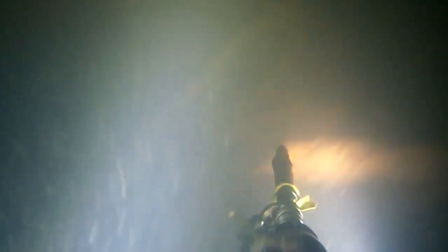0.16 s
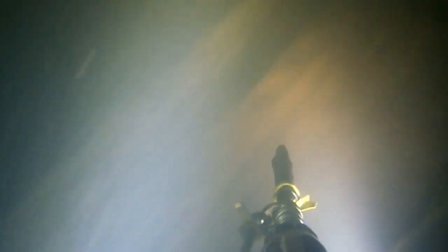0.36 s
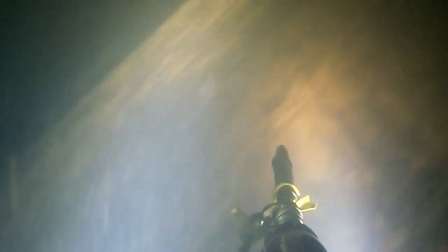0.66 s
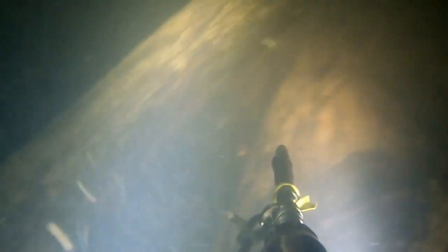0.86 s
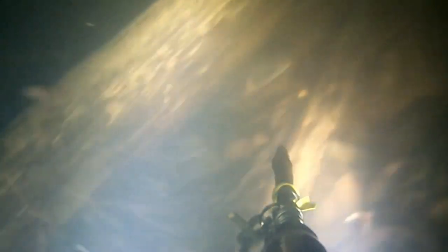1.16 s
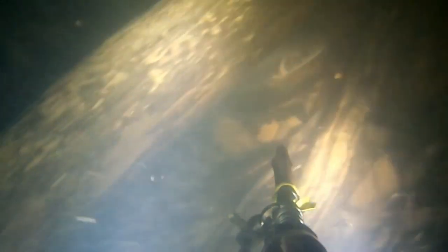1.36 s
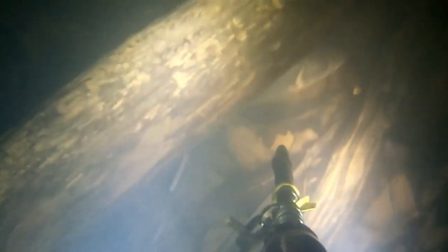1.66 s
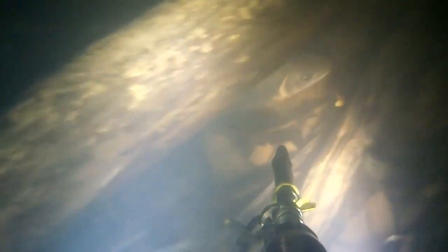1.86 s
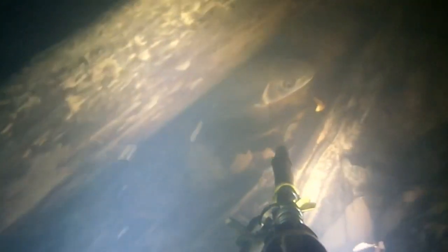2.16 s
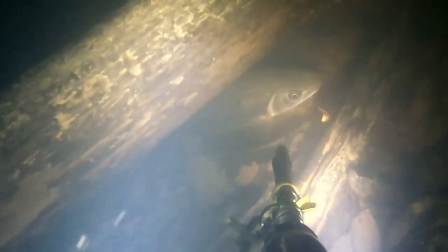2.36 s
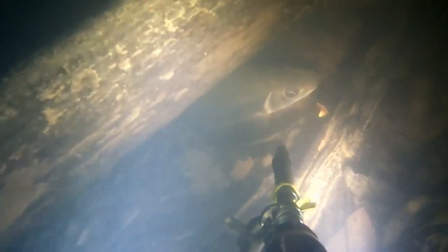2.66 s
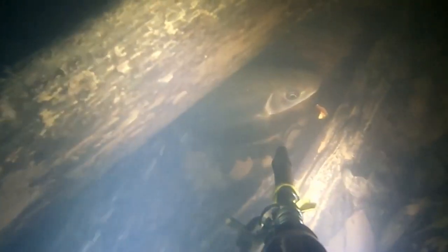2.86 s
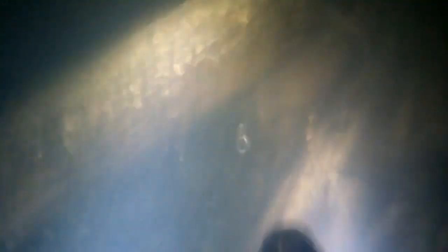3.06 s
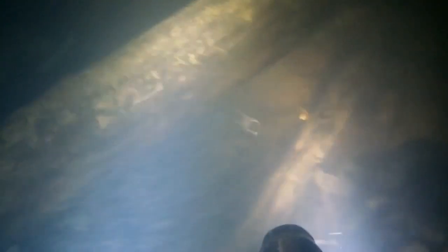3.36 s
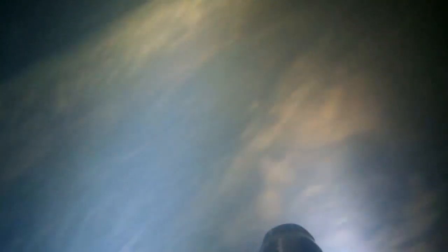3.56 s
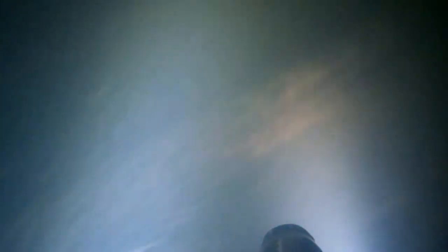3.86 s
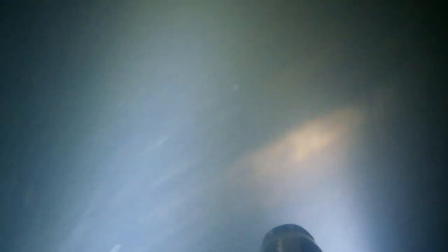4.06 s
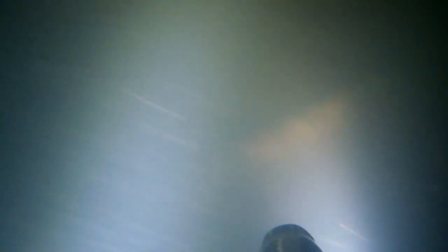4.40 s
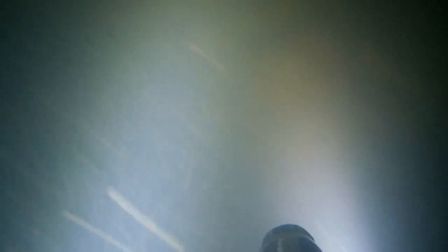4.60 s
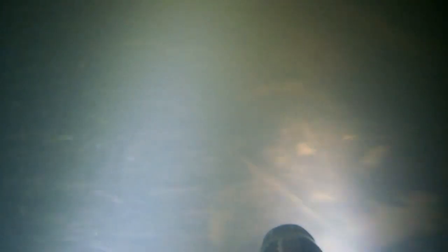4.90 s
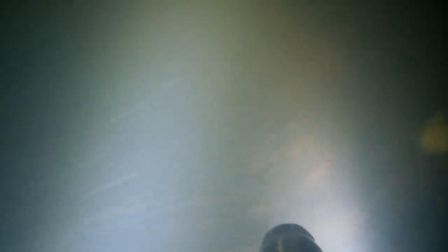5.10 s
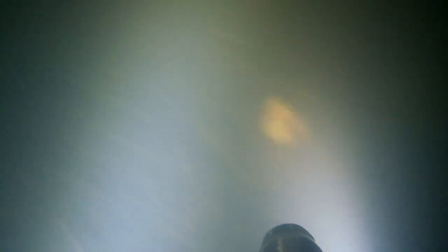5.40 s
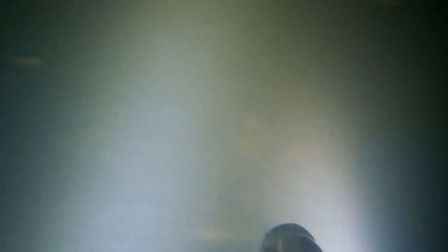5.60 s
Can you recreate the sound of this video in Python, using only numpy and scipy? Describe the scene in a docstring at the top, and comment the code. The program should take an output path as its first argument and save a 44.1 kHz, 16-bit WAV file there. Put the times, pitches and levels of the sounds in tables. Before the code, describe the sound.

Inside a sealed housing underwater, near-silence breaks with a huge distorted clanging blow, followed by hollow glugs, knocks, rasping line and scattered bubbles.

```python
"""Under a river, a sealed camera housing rides on a speargun, its microphone close to the barrel.
The gun fires: the trigger drags, the spear slams along its track and the barrel swings and rattles.
The line then rasps out in jerks, sheds bubbles and clicks, while slack gear knocks on the barrel.
Water gurgles round the housing, whose hollow note is struck by blows and swelled by gulps; the barrel
hums very low. The preamplifier overloads, the gain ducks and the converter clips."""
import sys
import numpy as np
from scipy import signal
from scipy.fft import rfft, irfft, next_fast_len
from scipy.io import wavfile

SR = 44100
rng = np.random.default_rng(int(sys.argv[2]) if len(sys.argv) > 2 else 0)


def log_audio(samples):
    """Write samples as a 16-bit WAV file to the path given in sys.argv[1]."""
    # one column per channel
    frames = np.atleast_2d(samples).T
    # limit to full scale, then quantise
    limited = np.clip(frames, -1, 1)
    pcm = np.round(limited * 32767).astype(np.int16)
    wavfile.write(sys.argv[1], SR, pcm)


N = 253134
TIME = np.arange(N) / SR

# All levels are taken ahead of the recorder; scene() trims some sources further.
# blows of the spear along its track: start_s, level_db, bright_db, t60_s
SPEAR_BLOWS = [(2.9645, 12, -4, 0.026), (2.9708, 13, 4.5, 0.016), (2.984, 27, -2, 0.068),
               (2.995, 26, 3, 0.091), (3.008, 19.5, -6.5, 0.028)]
# recoil swings of the barrel: start_s, level_db, pitch_hz, t60_s, stop_s (from the start until the grip stops it)
RECOIL_SWINGS = [(2.962, 15, 80.6, 0.058, .1), (2.976, 16.5, 31.77, 0.55, 0.22)]
# drag of the trigger mechanism before it lets go: time_s, level_db
TRIGGER_DRAG = [(2.78, -62.5), (2.84, -38), (2.885, -25.5), (2.925, -40.5), (2.955, -23), (2.975, -60)]
# sharp knocks of gear on the gun: start_s, level_db, bright_db, t60_s
GEAR_KNOCKS = [(0.945, -24, -22, 0.029), (1.027, -14, -44, 0.025), (2.565, -29.5, -16, 0.022),
               (2.694, -23.5, -17, 0.051), (3.118, -8.5, -13, 0.056), (3.165, 1, -13.5, 0.065),
               (3.185, 4.5, -19, 0.042), (3.544, 6.5, -23.5, 0.03), (3.62, 4, -37, 0.042),
               (3.675, -5, -25, 0.045), (3.682, -3, -45, 0.013), (3.752, -2, -34.5, 0.032),
               (3.788, -12.5, -34, 0.054), (3.842, -15.5, -11.5, 0.047), (3.897, -8.5, -32, 0.066),
               (3.937, -12.5, -16, 0.068), (4.014, -15.5, -15, 0.18), (4.328, -11.5, -31.5, 0.02),
               (4.644, -15.5, -44, 0.024), (4.666, -21.5, -36, 0.033), (5.408, -7, -13.5, 0.075),
               (5.43, -19.5, -18.5, 0.098), (5.516, -26.5, -24.5, 0.018), (5.651, -21, -38, 0.093)]
# housing modes besides its hollow note: pitch_hz, level_db, t60_s
HOUSING_MODES = [(184.4, -2, 0.066), (277, -9.5, 0.086), (1043.7, -5.5, 0.057), (1339, 2, 0.034),
                 (1720, -5, 0.027), (2358, -11.5, 0.025), (2783, -11.5, 0.0084), (3570, -25, 0.01),
                 (3830, -19, 0.015)]
# jerks of the line: centre_s, level_db, half_length_s
LINE_JERKS = [(3.379, -34.5, 0.019), (3.482, -38.5, 0.05), (3.676, -42, 0.0043), (3.898, -36.5, 0.022),
              (4.088, -47.5, 0.016), (4.21, -47, 0.014), (4.654, -44.5, 0.026), (4.797, -51.5, 0.043)]
# hard clicks of the line's fittings: start_s, level_db
FITTING_CLICKS = [(3.5453, -26), (3.6232, -24), (3.675, -34), (3.846, -27), (3.941, -12.5)]
# single ringing bubbles: start_s, level_db, pitch_hz, t60_s
SINGLE_BUBBLES = [(0.052, -49.5, 1770, 0.042), (0.64, -49.5, 2820, 0.045), (0.754, -41.5, 960, 0.036),
                  (0.945, -38, 1710, 0.025), (1.031, -30.5, 482, 0.18), (3.883, -34.5, 2760, 0.048),
                  (3.903, -31, 2700, 0.028), (3.914, -29.5, 3040, 0.033), (3.927, -23.5, 1717, 0.076),
                  (4.009, -26, 1920, 0.048), (4.012, -22.5, 1350, 0.031), (4.203, -24.5, 1797, 0.037),
                  (5.222, -41.5, 1360, 0.072), (5.409, -22, 1474, 0.02), (5.431, -31.5, 1390, 0.028)]
# puffs of fine fizz: start_s, level_db, length_s (twice the time to the peak)
FIZZ_PUFFS = [(4.786, -62, 0.053), (5.06, -55.5, 0.076)]
# gulps of water that swell and fade: start_s, level_db, length_s (twice the time scale of the swell)
WATER_GULPS = [(0.104, -40.5, 0.069), (0.162, -30.5, 0.015), (0.52, -41.5, 0.0083), (0.754, -38, 0.023),
               (1.374, -42, 0.024), (1.51, -38.5, 0.028), (1.652, -39, 0.028), (2.359, -37, 0.0085),
               (3.238, -11, 0.014), (3.306, -14, 0.019), (3.363, -6.5, 0.024), (3.408, -11, 0.013),
               (3.449, -14.5, 0.02), (3.47, -11, 0.02), (3.5, -15, 0.017), (3.802, -16.5, 0.012),
               (3.849, -12, 0.019), (3.988, -22, 0.0091), (4.033, -24, 0.014), (4.081, -23, 0.017),
               (4.108, -12, 0.023), (4.181, -18.5, 0.015), (4.201, -16, 0.0088), (4.415, -24, 0.019),
               (4.447, -14.5, 0.03), (4.506, -16, 0.019), (4.601, -26, 0.036), (4.749, -21.5, 0.066),
               (4.805, -26, 0.03), (5.057, -18.5, 0.021), (5.601, -29.5, 0.011)]
# water moving past the housing, stirred up by the shot and settling: time_s, gurgle_db, rumble_db
WATER_FLOW = [(0.0, -55, -66), (0.17, -57, -46), (0.34, -62, -63), (1.55, -53, -62), (2.2, -58.5, -57.5),
              (2.74, -48.5, -52.5), (2.9, -27.5, -52), (3.08, -21, -17), (3.26, -31, -36),
              (3.38, -13.5, -47), (3.54, -21.5, -34.5), (3.6, -28, -40), (3.95, -22, -42.5),
              (4.3, -36, -46.5), (4.8, -37.5, -58), (4.95, -46, -55), (5.15, -39.5, -46),
              (5.45, -51, -41.5), (5.74, -41.5, -47)]
# sways that set the barrel trembling harder: centre_s, level_db
BARREL_SWAYS = [(1.07, -36), (1.84, -46), (2.26, -37.5), (2.56, -40), (2.9, -33.5), (3.5, -27.5),
                (4.92, -40.5), (5.22, -34), (5.36, -40)]

# spectrum of the dragging trigger: frequency_hz, level_db (relative, as in all the spectra)
SCRAPE_SPECTRUM = [(60, -18.5), (200, 1.5), (400, -7), (560, 5.5), (750, -21), (1080, -6), (1500, -25.5),
                   (3000, -37), (8000, -67.5)]
# spectrum of the noise in a hard blow: frequency_hz, level_db
CRACK_SPECTRUM = [(80, 0.5), (300, 6), (800, 6), (1700, 0), (3500, -15.5), (6000, -29), (15000, -51.5)]
# spectrum of the rasping line: frequency_hz, level_db
RASP_SPECTRUM = [(300, -18), (800, -8.5), (1050, 14), (1200, -23), (1350, -3.5), (1520, -7.5), (1800, 15),
                 (2350, -9), (3100, -0.5), (4900, -13.5), (6000, -8), (7500, -28.5), (10000, -41),
                 (16000, -40)]
# spectrum of a fitting's click: frequency_hz, level_db
TICK_SPECTRUM = [(800, -13), (2000, 4.5), (3600, 13), (4500, -7.5), (5600, 7), (7500, -14.5), (9500, -23.5),
                 (15000, -22)]
# spectrum of the fizz: frequency_hz, level_db
SPRAY_SPECTRUM = [(2500, -29), (4100, -10), (4650, 2.5), (5200, -15), (6000, -16), (7500, -32)]
# spectrum of water heard through the hollow housing: frequency_hz, level_db
WATER_SPECTRUM = [(60, -31), (130, -30), (185, -24), (260, -26.5), (340, -23), (440, -14), (520, -8),
                  (570, 2), (625, -6), (720, -17), (900, -34.5), (1400, -40.5), (2500, -83.5)]
# spectrum of the rumble: frequency_hz, level_db
RUMBLE_SPECTRUM = [(60, 6.5), (110, -1.5), (190, -4.5), (280, -4), (420, -20), (900, -64.5)]
# spectrum of river wash and microphone hiss: frequency_hz, level_db
FLOOR_SPECTRUM = [(29, -25), (50, 4.5), (62, -12), (96, -16), (258, -19), (353, -22), (483, -22.5),
                  (586, -26), (822, -28), (884, -27.5), (2620, -37), (8340, -44), (9870, -50),
                  (14900, -44.5), (16000, -56)]

HOLLOW_HZ, HOLLOW_SCATTER = 564.4, 0.012  # hollow note; share by which it varies from blow to blow
GULP_HZ, GULP_SCATTER = 566.8, 0.026  # pitch of a gulp; share by which it varies
# rattle after the shot: first turn; fall for each doubling of the number of turns
RATTLE_S, RATTLE_DB, RATTLE_FALL_DB = 3.0225, 12, -8
RATTLE_BRIGHT_DB, RATTLE_T60_S = -7, 0.047
HUM_DB, SWAY_S = -42, 0.076  # the barrel's steady tremble; how long a sway takes to build or die down
LINE_START_S, LINE_SLOWS_S, SWARM_END_S = 3.05, 4.15, 5.3  # the last ends the line's bubbles
LINE_DB, LINE_FALL_DB_PER_S = -45, 37.5  # even run of the line; its fall once it slows


def shot():
    """The trigger drags, the steel spear slams along its track and sings, and the barrel swings."""
    dragging = (TIME > TRIGGER_DRAG[0][0]) * (TIME < TRIGGER_DRAG[-1][0])
    out = grains(1000, 2.95, SCRAPE_SPECTRUM) * undb(curve(TRIGGER_DRAG)) * dragging
    t = TIME[:SR]
    for start_s, level_db, pitch_hz, t60_s, stop_s in RECOIL_SWINGS:
        grip = np.exp(-(t / stop_s) ** 10)
        add(out, start_s, undb(level_db) * ring(t, pitch_hz, t60_s) * grip)
    # the spear's own singing note
    add(out, SPEAR_BLOWS[2][0], undb(-0.5) * ring(t, 1290, 0.28))
    out += knocks(rattle(), modes_db=-6.5, crack_db=-9, crack_t60_s=0.038, rise_s=0.0005, contact_s=0.00096)
    out += knocks(SPEAR_BLOWS, modes_db=-6.0, crack_db=-7.0, crack_t60_s=0.071, rise_s=0.00082,
                  contact_s=0.00081)
    return out


def rattle(count=6):
    """Gear strikes at each half swing of the barrel, ever more softly; gives rows for knocks()."""
    half_swing_s = 0.5 / RECOIL_SWINGS[1][2]
    rows = []
    for k in range(count):
        level_db = RATTLE_DB + RATTLE_FALL_DB * np.log2(k + 1)
        rows.append((RATTLE_S + k * half_swing_s, level_db, RATTLE_BRIGHT_DB, RATTLE_T60_S))
    return rows


def knocks(table, modes_db, crack_db, crack_t60_s, rise_s, contact_s):
    """Each blow builds up the hollow note; bright ones add more of the other modes and a noisy crack."""
    out, t = np.zeros(N), TIME[:2 ** 14]
    contact = 1 - np.exp(-(t / contact_s) ** 2)  # water cushions the first touch
    for start_s, level_db, bright_db, t60_s in table:
        pitch_hz = HOLLOW_HZ * (1 + HOLLOW_SCATTER * rng.standard_normal())
        hollow = peak(ring(t, pitch_hz, t60_s) * (1 - np.exp(-t / rise_s)))
        detune = 1 + 0.023 * rng.standard_normal(len(HOUSING_MODES))
        shell = np.zeros(len(t))
        for (mode_hz, mode_db, mode_t60_s), shift in zip(HOUSING_MODES, detune):
            shell += undb(mode_db) * ring(t, mode_hz * shift, mode_t60_s)
        crack = colour(rng.standard_normal(len(t)), CRACK_SPECTRUM) * fade(t, crack_t60_s)
        bright = undb(modes_db) * shell + undb(crack_db) * crack
        add(out, start_s, undb(level_db) * contact * (hollow + undb(bright_db) * bright))
    return out


def line(gain_db, uneven_db, click_db, click_t60_s):
    """The line rasps over the barrel in jerks, and its fittings click."""
    out = grains(900, 2.2, RASP_SPECTRUM) * line_pull() * undb(gain_db + uneven_db * walk(60))
    t = TIME[:2 ** 11]
    for start_s, level_db in FITTING_CLICKS:
        tick = colour(rng.standard_normal(len(t)), TICK_SPECTRUM) * fade(t, click_t60_s)
        add(out, start_s, undb(level_db + click_db) * peak(tick))
    return out


def line_pull():
    """Gain of the running line: it holds, then dies away as the spear slows; jerks ride on top."""
    running = np.interp(TIME, [LINE_START_S - 0.1, LINE_START_S], [0, 1])
    even = undb(LINE_DB - LINE_FALL_DB_PER_S * np.maximum(TIME - LINE_SLOWS_S, 0))
    return running * even + sum(surge(*row) for row in LINE_JERKS)


def bubbles(swarm_db, spread_db, swarm_t60_s, count):
    """Single bubbles ring, the running line sheds a swarm, and puffs of noise fizz."""
    out, pull = np.zeros(N), line_pull()
    for start_s, level_db, pitch_hz, t60_s in SINGLE_BUBBLES:
        add(out, start_s, undb(level_db) * bubble(pitch_hz, t60_s, glide=0.018))
    for when, size, strength in rng.random((count, 3)):
        start_s = LINE_START_S + when * (SWARM_END_S - LINE_START_S)
        level_db = swarm_db + spread_db * (strength - 1) - 7 * size  # higher bubbles are softer
        gain = pull[int(start_s * SR)] * undb(level_db)
        add(out, start_s, gain * bubble(750 * 5 ** size, swarm_t60_s, glide=0.21))
    for start_s, level_db, length_s in FIZZ_PUFFS:
        age = TIME[:2 ** 14] / (length_s / 2)
        swell = peak(age ** 2 * np.exp(-2 * age))
        add(out, start_s, undb(level_db) * swell * colour(rng.standard_normal(len(age)), SPRAY_SPECTRUM))
    return out


def bubble(pitch_hz, t60_s, glide):
    """A small bubble rings as it pinches off, its pitch climbing by the share glide in each t60."""
    t = TIME[:2 ** 13]
    phase = 2 * np.pi * pitch_hz * t * (1 + glide * t / t60_s / 2)
    onset = 1 - np.exp(-(t / 0.00075) ** 2)
    return peak(np.sin(phase) * fade(t, t60_s) * onset)


def gulps(gain_db, churn_db, rumble_db):
    """Pockets of water swell the hollow note, each at a slightly different, rising pitch."""
    out, t = np.zeros(N), TIME[:2 ** 13]
    for start_s, level_db, length_s in WATER_GULPS:
        pitch_hz = GULP_HZ * (1 + GULP_SCATTER * rng.standard_normal())
        age = t / (length_s / 2)
        rising_hz = pitch_hz * (1 + 0.018 * (np.minimum(age, 3) - 1))
        note = np.sin(2 * np.pi * np.cumsum(rising_hz) / SR)
        churn = undb(churn_db) * colour(rng.standard_normal(len(t)), WATER_SPECTRUM)
        rumble = undb(rumble_db) * colour(rng.standard_normal(len(t)), RUMBLE_SPECTRUM)
        swell = age ** 1.43 * np.exp(-1.7 * age)
        add(out, start_s, undb(level_db + gain_db) * peak(swell * (note + churn + rumble)))
    return out


def gurgle(gain_db, lumps_db, rumble_db):
    """Small eddies patter on the housing in uneven lumps; large ones rumble."""
    patter_db = curve(WATER_FLOW) + gain_db + lumps_db * walk(42)
    patter = grains(500, 2.6, WATER_SPECTRUM) * undb(patter_db)
    rumble = grains(400, 1.7, RUMBLE_SPECTRUM) * undb(curve(WATER_FLOW, column=2) + rumble_db)
    return patter + rumble


def hum(pitch_hz, wander, flutter_db):
    """The current keeps the barrel trembling at its lowest mode, harder at each sway."""
    phase = 2 * np.pi * np.cumsum(pitch_hz * (1 + wander * walk(20))) / SR
    strength = undb(HUM_DB) + sum(surge(start_s, level_db, SWAY_S) for start_s, level_db in BARREL_SWAYS)
    return np.sqrt(2) * np.sin(phase) * strength * undb(flutter_db * walk(16))


def floor(level_db):
    """Even wash of the river and hiss of the microphone: shaped noise at an almost steady level."""
    noise = colour(rng.standard_normal(next_fast_len(N)), FLOOR_SPECTRUM)[:N]
    return undb(level_db + 0.5 * walk(1.1)) * noise


def undb(db):
    """Decibels to gain."""
    return 10 ** (np.asarray(db) / 20)


def curve(table, column=1):
    """One column of a table, joined by straight lines in time."""
    rows = np.array(table)
    return np.interp(TIME, rows[:, 0], rows[:, column])


def colour(x, spectrum):
    """Shape x to a spectrum, rolled off below its first point, at rms 1."""
    hz, db = np.transpose(spectrum)
    bins_hz = np.maximum(np.arange(len(x) // 2 + 1) * SR / len(x), 1)
    gain = undb(np.interp(np.log(bins_hz), np.log(hz), db))
    gain *= np.minimum(bins_hz / hz[0], 1) ** 2
    y = irfft(rfft(x) * gain, len(x))
    return y / np.std(y)


def peak(x):
    """Scale to a peak of 1."""
    return x / np.abs(x).max()


def fade(t, t60_s):
    """Exponential decay, down 60 dB after t60_s."""
    return np.exp(-np.log(1000) * t / t60_s)


def ring(t, pitch_hz, t60_s):
    """One struck mode: a decaying sine."""
    return np.sin(2 * np.pi * pitch_hz * t) * fade(t, t60_s)


def add(out, start_s, x):
    """Mix x in at start_s."""
    i = int(start_s * SR)
    out[i:i + len(x)] += x[:N - i]


def walk(rate_hz):
    """Slow random wander: random points joined by straight lines."""
    step = int(SR / rate_hz)
    points = rng.standard_normal(N // step + 2)
    return np.interp(np.arange(N) / step, np.arange(len(points)), points)


def grains(rate_hz, spread_db, spectrum):
    """Dense tiny impacts of uneven size, coloured by what they strike."""
    size = next_fast_len(N)
    hits = (rng.random(size) < rate_hz / SR) * rng.choice([-1, 1], size)
    strength_db = spread_db * np.minimum(rng.exponential(size=size), 4)
    return colour(hits * undb(strength_db), spectrum)[:N]


def surge(centre_s, level_db, half_length_s):
    """A smooth rise and fall of gain round centre_s."""
    return undb(level_db) * np.exp(-((TIME - centre_s) / half_length_s) ** 2)


def scene():
    """Everything reaches one microphone through the housing."""
    gear = knocks(GEAR_KNOCKS, modes_db=0.5, crack_db=8.5, crack_t60_s=0.016, rise_s=0.0028,
                  contact_s=0.0016)
    running_line = line(gain_db=-3.0, uneven_db=5.0, click_db=-5.0, click_t60_s=0.027)
    running_line += bubbles(swarm_db=3.0, spread_db=20.5, swarm_t60_s=0.016, count=420)
    water = gurgle(gain_db=-0.5, lumps_db=3.0, rumble_db=-0.5)
    water += gulps(gain_db=2.5, churn_db=-7.5, rumble_db=-22.5)
    barrel = hum(pitch_hz=31.5, wander=0.054, flutter_db=3.5)
    return (shot() + gear + running_line + water + barrel + floor(level_db=-47.5))[None]


def gain_control(x, top, attack_s, release_s):
    """Turns down while the smoothed level stays above top, and recovers more slowly."""
    block = 32  # samples
    level = np.abs(x[:N // block * block]).reshape(-1, block).mean(axis=1)
    held, follower = np.empty(len(level)), 0
    for i, now in enumerate(level):
        response_s = attack_s if now > follower else release_s
        follower += (now - follower) * min(block / SR / response_s, 1)
        held[i] = follower
    gain = top / np.maximum(held, top)
    return x * np.interp(np.arange(N), np.arange(len(held)) * block, gain)


def record(dry):
    """The preamplifier saturates, its coupling lets flat tops droop, the gain ducks, the converter clips."""
    rail = 1.45
    coupling = signal.butter(1, 17, "high", fs=SR, output="sos")
    x = signal.sosfilt(coupling, np.clip(dry[0], -rail, rail))
    x = gain_control(x, top=0.53, attack_s=0.0075, release_s=0.043)
    top_limit = signal.ellip(8, 0.2, 70, 15900, fs=SR, output="sos")  # low-pass, edge in Hz
    return signal.sosfilt(top_limit, np.clip(x, -1, 1))[None]


dry = scene()
out = record(dry)
log_audio(out)
```